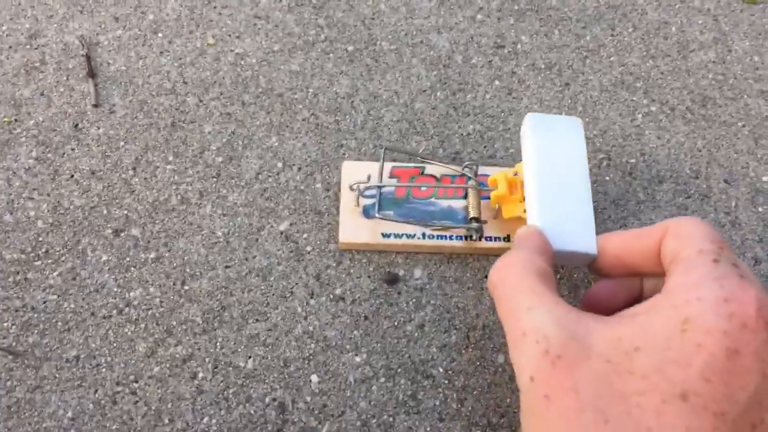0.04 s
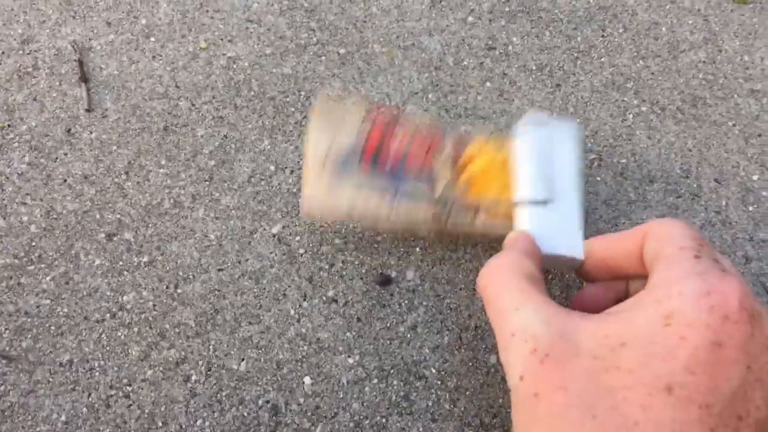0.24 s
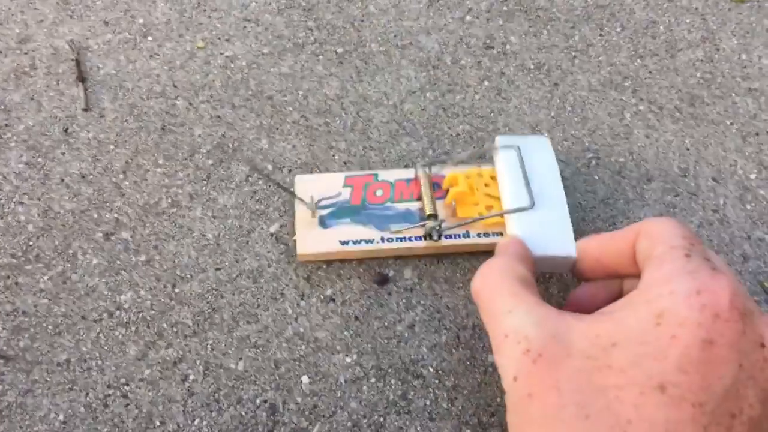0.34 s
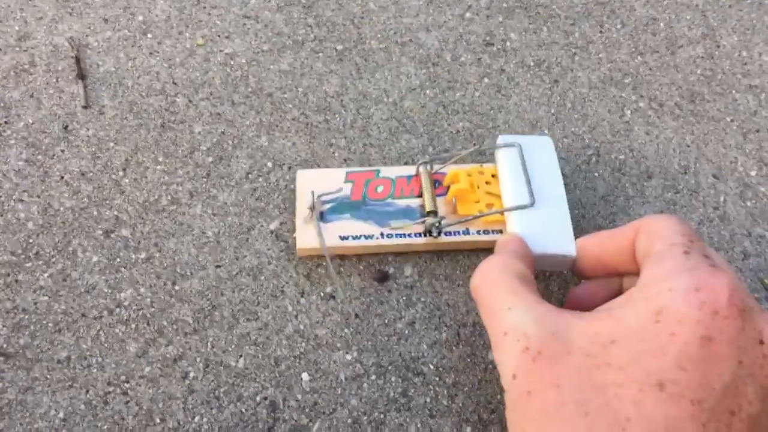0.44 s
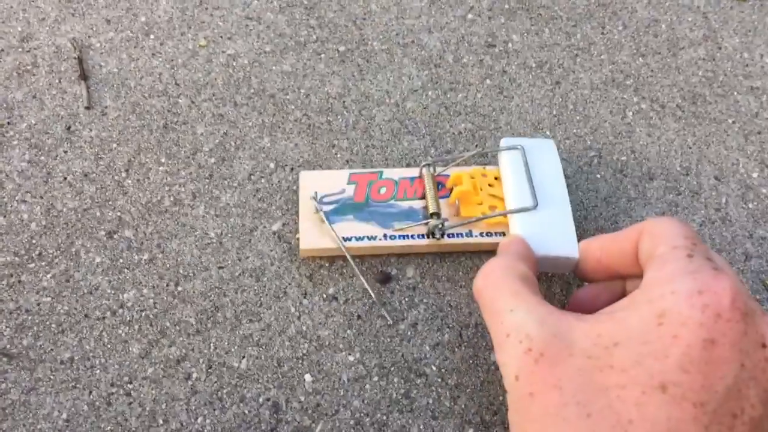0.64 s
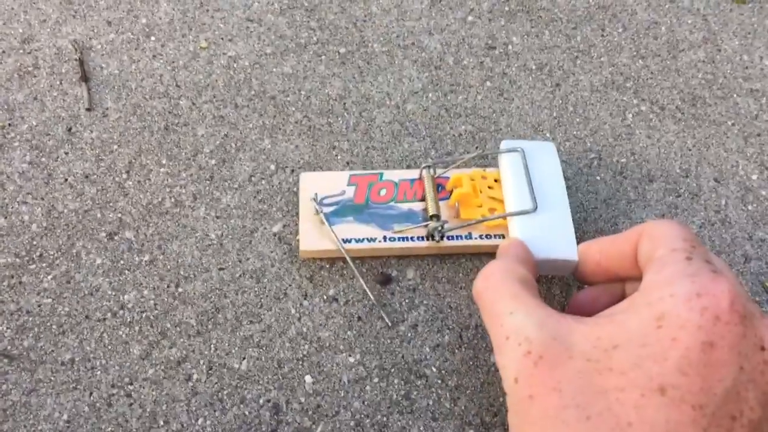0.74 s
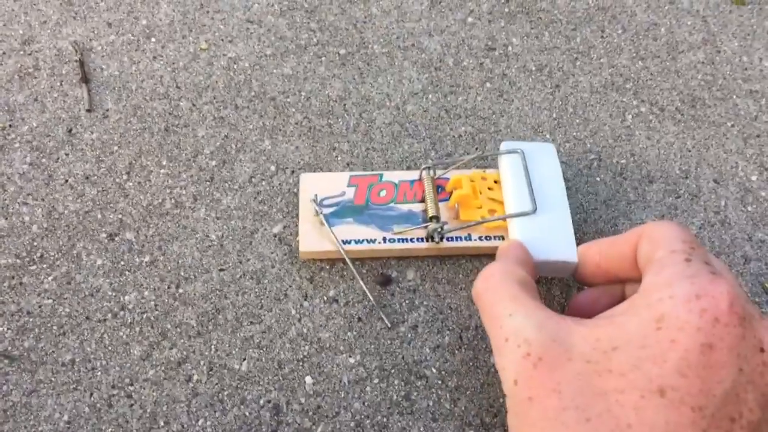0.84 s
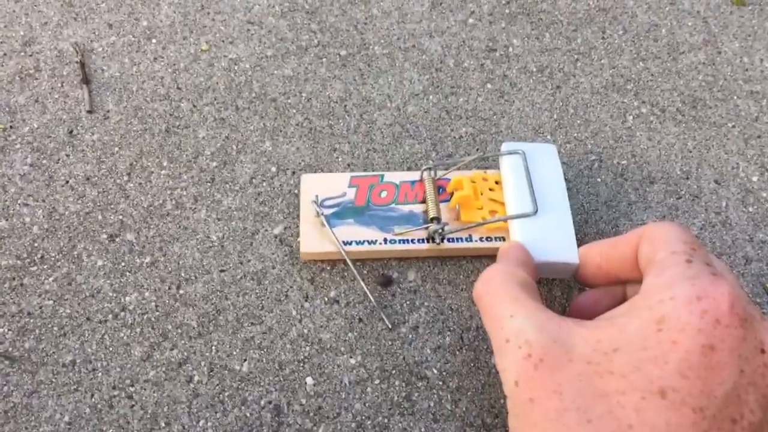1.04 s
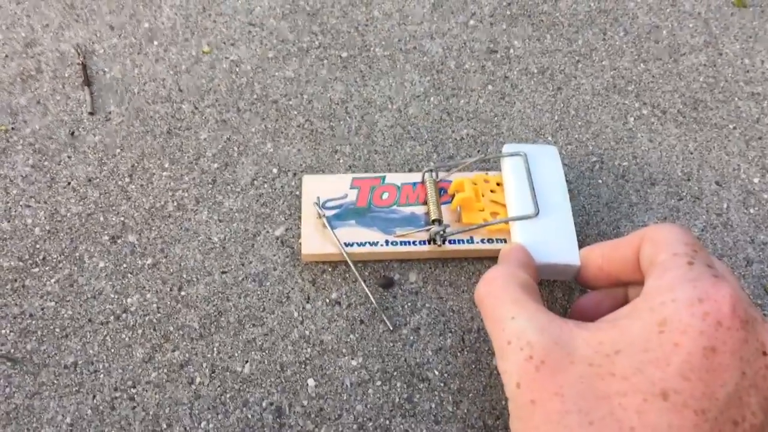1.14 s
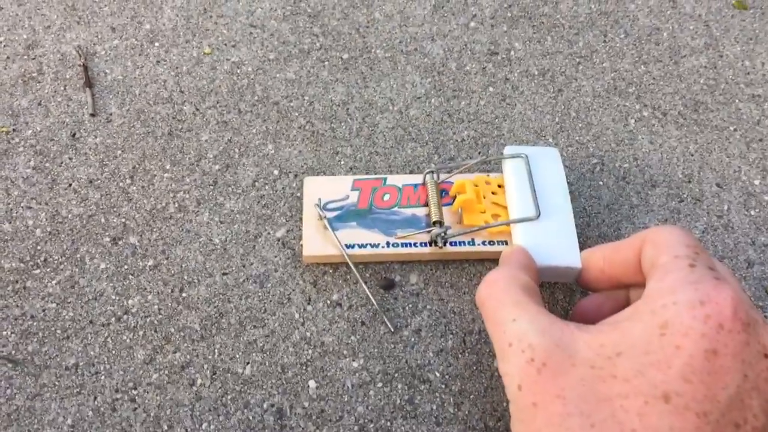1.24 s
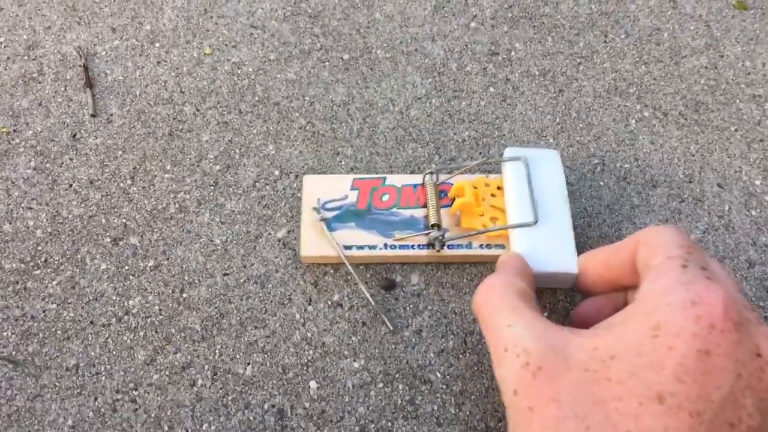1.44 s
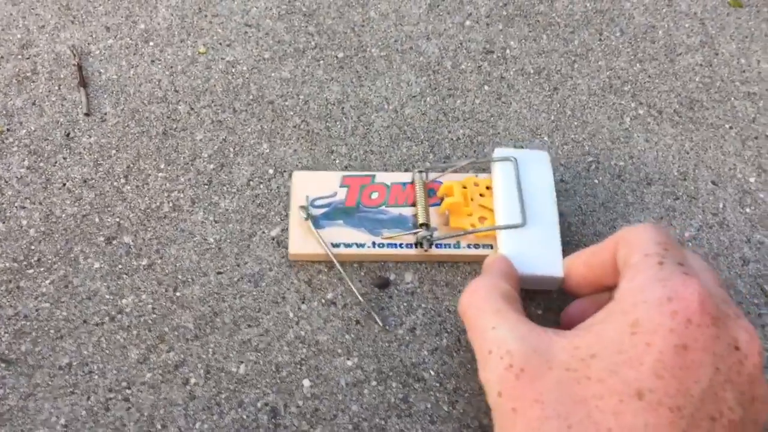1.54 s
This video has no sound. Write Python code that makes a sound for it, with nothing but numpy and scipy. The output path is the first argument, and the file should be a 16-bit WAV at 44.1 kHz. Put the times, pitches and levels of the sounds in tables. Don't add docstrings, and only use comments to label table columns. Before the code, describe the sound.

Mousetrap snap: one loud, dry wood-and-metal clack, a quick landing clatter and small wire ticks outdoors

```python
import sys
import numpy as np
from scipy import signal
from scipy.io import wavfile
from scipy.ndimage import uniform_filter1d

SR = 44100
rng = np.random.default_rng(int(sys.argv[2]) if len(sys.argv) > 2 else 0)


def pcm_store(signal):
    levels = np.round(np.clip(np.atleast_2d(signal), -1, 1) * 32767)
    wavfile.write(sys.argv[1], SR, levels.astype(np.int16).T)


def to_linear_factor(level_db):
    exponent = np.asarray(level_db, float) / 20
    return 10 ** exponent


N = 70560

# time in seconds, bar level in dB, wood and wire levels in dB relative to the bar.
AIR_CONTACTS = [(0.2154, -42, 4, -2), (0.2177, -33, 0, -2), (0.2326, -23, -4, 0), (0.2385, -7, -12, 0),
                (0.255, -19, -10, 5), (0.2616, -18, -9, -7), (0.27, -32, -5, -2), (0.2749, -9, -20, -3),
                (0.2788, -20, -14, 12), (0.2817, -10, -17, -2), (0.2861, -23, -11, 3),
                (0.2891, -12, -22, -9), (0.2913, -18, -12, 4), (0.2963, -15, -23, 1), (0.3022, -17, -22, 4),
                (0.3075, -17, -19, 3), (0.3104, -20, -11, -4), (0.3127, -17, -19, -7),
                (0.3173, -23, -17, 3), (0.3192, -21, -22, -2), (0.3227, -16, -28, -10),
                (0.3261, -24, -17, 1), (0.331, -27, -15, -3), (0.3372, -28, -13, -2),
                (0.3399, -24, -19, -14), (0.3453, -36, -12, -8), (0.349, -35, -4, -3), (0.3633, -40, 1, 2)]
# time in seconds, bar level in dB, wood relative to bar in dB, deep over high bar modes in dB.
LANDING_CONTACTS = [(0.3798, -11, -12, 7), (0.3871, -19, -5, 3), (0.3892, -13, -18, -5),
                    (0.3911, -8, -22, -6), (0.3972, -18, -11, -1), (0.4009, -10, -19, -11),
                    (0.4068, -17, -17, -18), (0.411, -18, -21, -10), (0.4133, -19, -12, 0),
                    (0.424, -15, -16, -10), (0.4374, -29, -16, 5), (0.4476, -30, -3, 10),
                    (0.4522, -22, -13, 5), (0.4645, -21, -15, -9), (0.47, -20, -22, -15),
                    (0.4788, -21, -15, -8), (0.4815, -18, -16, -4), (0.4838, -19, -13, -9),
                    (0.4921, -38, 1, 7), (0.4971, -27, -10, 2), (0.5134, -28, -18, -6),
                    (0.5243, -35, -12, 3), (0.5408, -33, -24, -13), (0.5557, -42, -4, 13)]
SETTLING_CONTACTS = [(0.5672, -12, -20, -3), (0.5725, -20, -13, 0), (0.5761, -13, -20, 0),
                     (0.5794, -12, -18, -5), (0.5875, -19, -17, 0), (0.591, -23, -10, 1),
                     (0.5984, -37, -5, -3), (0.6025, -36, -5, -3), (0.6102, -31, -6, -2),
                     (0.6158, -39, 5, -1), (0.62, -28, -3, -2), (0.6219, -34, -12, 0),
                     (0.6248, -32, -2, -2), (0.6296, -21, -16, 9), (0.632, -28, -6, 7),
                     (0.6337, -31, -11, 11), (0.6458, -40, -4, 2), (0.7024, -33, -16, 8),
                     (0.7051, -37, -10, 18), (0.7262, -27, -11, 16), (0.7297, -36, -8, 16),
                     (0.7563, -35, -11, 10), (1.5367, -56, 6, 10), (1.5634, -50, -12, 8)]

# pitch in Hz, level in dB, time to fade by 60 dB in seconds.
WOOD_MODES = [(1750, -11, .006), (2250, -6, .007), (2850, -4, .007), (3280, -3, .009), (3510, -9, .022),
              (3850, -7, .008), (4280, -6, .008), (4900, -8, .007)]
BAR_MODES = [(5400, -10, .006), (5900, -7, .007), (6350, -4, .011), (6900, -6, .012), (7550, -6, .011),
             (8400, -6, .008), (8750, 1, .012), (9150, -6, .008)]
WIRE_MODES = [(10860, -3.5, 0.0036), (11600, -4, 0.00792), (11700, -7.5, 0.014), (12900, -3, 0.005),
              (13660, -13.5, 0.012), (14770, -9.5, 0.0045), (15800, -9, .005)]
LINGERING_MODES = [(1410, -58, .12), (4258, -53, .2), (12905, -49, .13), (13460, -49, .14),
                   (14235, -55, .2), (14845, -53, .12)]

# start, length and rise in seconds, then wood, bar and wire levels in dB.
DENSE_CHATTER = [
    (0.229, 0.0098, 0.0057, -24.5, -17.5, -13),
    (0.239, 0.0092, 0.00053, -2, -3, -4),
    (0.244, 0.026, 0.0026, -24, -23.5, -28.5),
    (0.27, .075, 0.00275, -44.5, -32, -35.5),
    (0.386, 0.012, 0.00078, -36, -26, -27.5),
    (0.58, 0.015, 0.00095, -43.5, -45.5, -53),
    (0.31, 0.51, 0.0076, -58, -53, -69),
]
RELEASE_CHATTER = [
    (.2145, .017, .002, -60, -56, -52),
]

# time in seconds, peak in dB, pitch in Hz, time to fade by 60 dB in seconds.
FIRM_BLOWS = [(.2386, 4, 3620, 0.016), (.2392, -6, 3380, 0.043), (0.2384, -5.5, 4000, 0.035),
              (0.2396, -14.5, 1060, 0.025), (0.2414, -8, 2290, 0.0092), (0.2395, -22, 1650, 0.024),
              (0.2465, -14.5, 2860, .016), (.2528, -12.5, 2190, 0.023), (.259, -18.5, 2000, 0.016),
              (.2749, -15, 2950, .009), (0.2764, -11, 2150, 0.0041), (0.28, -38, 1415, 0.137),
              (.3799, 2, 2950, .004), (.3799, -24, 2000, .004), (.4485, -36, 3523, 0.052),
              (.482, -35, 3516, 0.062), (.5135, -44, 3520, .03), (.7028, -46.5, 3540, 0.029),
              (.7266, -37, 3480, 0.028), (.7567, -45.5, 3510, .025), (.449, -58.5, 1410, 0.17),
              (.6325, -41, 3530, .03), (.3105, -23, 2094, .008), (0.3799, -1, 3270, 0.012),
              (.3798, -23.5, 1320, 0.028), (0.382, -15.5, 4350, .008), (0.389, -23, 3330, 0.033),
              (0.391, -46.5, 1415, 0.11), (.4012, -26, 3450, 0.026), (0.5667, -19, 3750, 0.0095),
              (.5674, -24, 2850, 0.012), (.5676, -32, 4900, 0.015), (0.568, -46.5, 1415, 0.076),
              (0.5789, -16.5, 4250, 0.011), (0.583, -46.5, 1415, 0.16)]
# time in seconds, level in dB.
DULL_KNOCKS = [
    (.2388, -8),
    (.2747, -11),
    (.3799, -17),
]

# pitch in Hz, level in dB per Hz.
RUMBLE_SPECTRUM = [(25, -28), (58, 0.5), (135, -1), (251, -11), (357, -34), (1240, -26.5), (2900, -36.5),
                   (4300, -35.5), (6500, -72), (11000, -120)]
# time in seconds, gain in dB.
PHONE_BASS = [(0, 7), (.27, 6.5), (.31, -16), (.42, -14.5), (.635, -7), (.66, 0.5), (1.6, 2)]

AIR_DEEP_DB = 3


def fade(u, t60):
    return np.exp(-np.log(1000) * u / t60)


def ring(x, hz, t60):
    pole = np.exp(2j * np.pi * hz / SR - np.log(1000) / (t60 * SR))
    return signal.lfilter([1], [1, -pole], x).imag


def contacts(s, db, modes, split_hz, deep_db):
    rise_s, scatter_db, detune = .00025, 3.5, .01
    hz, gain_db, t60 = np.array(modes, float).T[:, :, None]
    u = np.arange(1600) / SR
    x = np.zeros(N + 1600)
    chance = rng.standard_normal((len(s), 3, len(modes), 1))
    for start, top_db, deep, c in zip(s, db, deep_db, chance):
        pitch = hz * (1 + detune * c[0])
        tones = np.sin(2 * np.pi * (pitch * u + c[1])) * fade(u, t60)
        mix = to_linear_factor(gain_db + deep * (hz < split_hz) + scatter_db * c[2])
        soft_start = 1 - np.exp(-(u / rise_s) ** 2)
        hit = (mix * tones).sum(axis=0) * soft_start
        k = int((start - rise_s) * SR)
        x[k:k + len(u)] += hit * to_linear_factor(top_db) / np.abs(hit).max()
    return x[:N]


def chatter(column):
    t, envelope = np.arange(N) / SR, 0
    for row in DENSE_CHATTER + RELEASE_CHATTER:
        length, rise = row[1:3]
        u = np.clip(t - row[0], 0, None)
        swell = np.clip(u / rise, 0, 1) ** 2
        die_away = np.clip(1 - (u / length) ** 3, 0, 1)
        envelope = envelope + to_linear_factor(row[column]) * swell * die_away
    spikes = to_linear_factor(3.58 * rng.exponential(size=N) - 10.5)
    return envelope * rng.standard_normal(N) * spikes


def ringing_chatter():
    out = 0
    for column, modes in [(3, WOOD_MODES), (4, BAR_MODES), (5, WIRE_MODES)]:
        for hz, gain_db, t60 in modes:
            tone = ring(chatter(column), hz, t60 / 2)
            out = out + to_linear_factor(gain_db) * tone / np.sqrt(t60 * SR / 28)
    return out


def ground_scatter(x):
    u = np.arange(3000) / SR
    tail = rng.standard_normal(3000) * fade(u, .035)
    tail = tail / np.sqrt((tail ** 2).sum())
    return to_linear_factor(-16) * signal.fftconvolve(x, tail)[:N]


def strikes(s, db):
    x = np.zeros(N)
    x[(s * SR).astype(int)] = to_linear_factor(db) * rng.standard_normal(len(s))
    return x


def trap():
    s, bar, wood, last = np.array(AIR_CONTACTS + LANDING_CONTACTS + SETTLING_CONTACTS, float).T
    in_air = s < LANDING_CONTACTS[0][0]
    wire = np.where(in_air, last, -13)
    bar_deep = np.where(in_air, AIR_DEEP_DB, last)
    wood_deep = np.where(in_air, AIR_DEEP_DB, .4 * (bar + wood))
    out = contacts(s, bar + wood + 2.5, WOOD_MODES, 3400, wood_deep)
    out = out + contacts(s, bar + 1.5, BAR_MODES, 8000, bar_deep)
    out = out + contacts(s, bar + wire + 3, WIRE_MODES, 0, 0 * s)
    out = out + ringing_chatter()
    out = out + ground_scatter(out)
    for hz, gain_db, t60 in LINGERING_MODES:
        out = out + to_linear_factor(gain_db) * ring(strikes(s, 0.42 * bar + 4), hz, t60)
    return out


def clacks():
    rise_s, out = 0.0003825, 0
    for s, db, hz, t60 in FIRM_BLOWS:
        u = np.clip(np.arange(N) / SR - s, 0, None)
        soft_start = 1 - np.exp(-(u / rise_s) ** 2)
        out = out + to_linear_factor(db) * soft_start * fade(u, t60) * np.sin(2 * np.pi * hz * u)
    return out


def air_push():
    start_hz, end_hz, glide_s = 215.5, 48, .0045
    rise_s, fall_s = 0.0048, 0.0077
    u = np.clip(np.arange(N) / SR - .2412, 0, None)
    hz = end_hz + (start_hz - end_hz) * np.exp(-u / glide_s)
    envelope = (1 - np.exp(-u / rise_s)) * np.exp(-u / fall_s)
    return to_linear_factor(4.5) * envelope * np.sin(2 * np.pi * np.cumsum(hz * (u > 0)) / SR)


def band(x, hz, width_hz):
    return signal.lfilter(*signal.iirpeak(hz, hz / width_hz, fs=SR), x)


def knocks():
    s, db = np.array(DULL_KNOCKS).T
    pushes = np.zeros(N)
    pushes[(s * SR).astype(int)] = -to_linear_factor(db)
    return to_linear_factor(12.5) * band(pushes, 933, 3000)


def level(x, db):
    return x * to_linear_factor(db) / np.sqrt(np.mean(x ** 2))


def walk(rate):
    k = int(SR / rate)
    steps = np.repeat(rng.standard_normal(N // k + 1), k)
    w = uniform_filter1d(uniform_filter1d(steps, k), k)[:N]
    return w / w.std()


def band_noise(hz, width_hz, passes=2):
    x = rng.standard_normal(N)
    for _ in range(passes):
        x = band(x, hz, width_hz)
    return x


def traffic():
    t, out = np.arange(N) / SR, 0
    table_hz, table_db = np.array(RUMBLE_SPECTRUM).T
    for hz in 30 * 2 ** np.arange(0, 7.6, .4):
        db = np.interp(np.log(hz), np.log(table_hz), table_db)
        db = db + 10 * np.log10(hz) + 1.9 * walk(6.24)
        out = out + to_linear_factor(db) * level(band_noise(hz, hz / 3), 0)
    far = level(out, -46.5)
    bass = signal.sosfiltfilt(signal.butter(2, 402.3, fs=SR, output="sos"), far)
    gain = to_linear_factor(np.interp(t, *np.array(PHONE_BASS).T))
    return far + (gain - 1) * bass


def passing_tyres():
    t = np.arange(N) / SR
    return level(band_noise(1246.5, 560), -65) * np.exp(-((t - 1.09) / 0.33) ** 2)


def insects():
    chorus = level(band_noise(6800, 800), -56) * to_linear_factor(2.0 * walk(65))
    return chorus + level(band_noise(6200, 3000, passes=3), -62)


def bird():
    start_s, length_s = 1.24, .16
    u = np.clip((np.arange(N) / SR - start_s) / length_s, 0, 1)
    hz = 3740 - 380 * u + 25 * walk(200)
    loudness = to_linear_factor(-65 + 4.0 * walk(300)) * np.sin(np.pi * u) ** 2
    return loudness * np.sin(2 * np.pi * np.cumsum(hz) / SR)


def scene():
    close = trap() + clacks() + air_push() + knocks()
    outdoors = traffic() + passing_tyres() + insects() + bird()
    return (close + outdoors)[None]


def band_limit(x):
    return signal.sosfilt(signal.butter(12, 16950, fs=SR, output="sos"), x)


def record(dry):
    ceiling = .7
    hissing = dry + to_linear_factor(-80) * rng.standard_normal(N)
    x = signal.sosfilt(signal.butter(14, 15700, fs=SR, output="sos"), hissing)
    mix = ceiling * np.tanh(x / ceiling)
    return band_limit(mix)


dry = scene()
out = record(dry)
pcm_store(out)
```